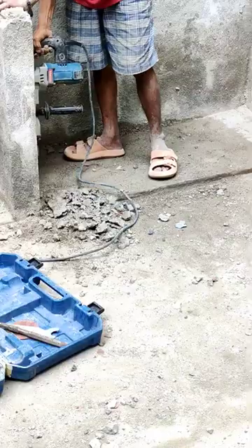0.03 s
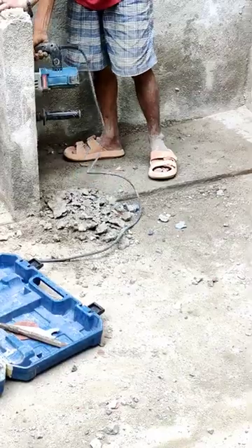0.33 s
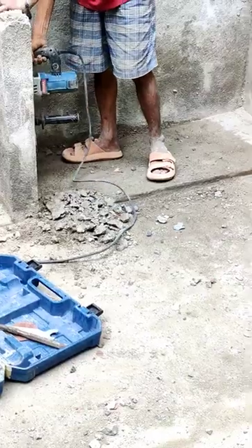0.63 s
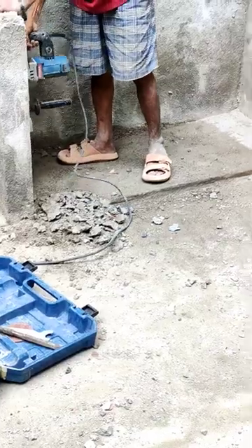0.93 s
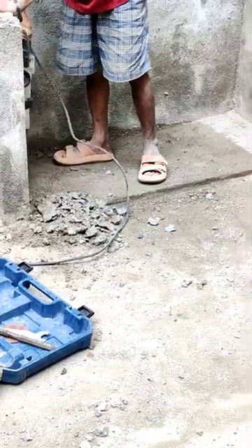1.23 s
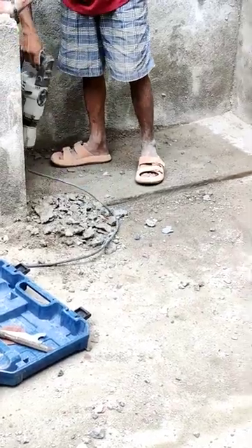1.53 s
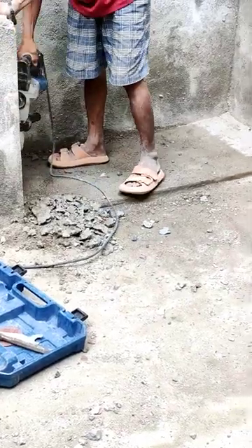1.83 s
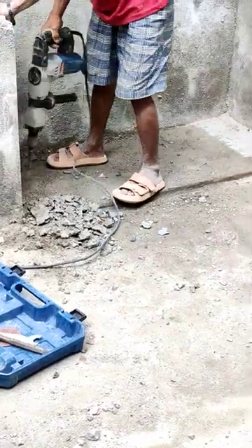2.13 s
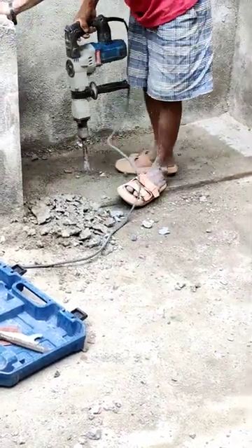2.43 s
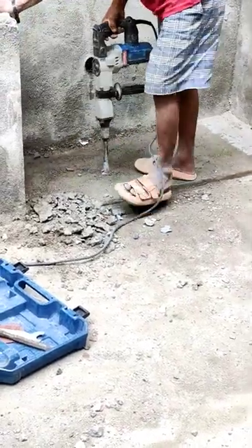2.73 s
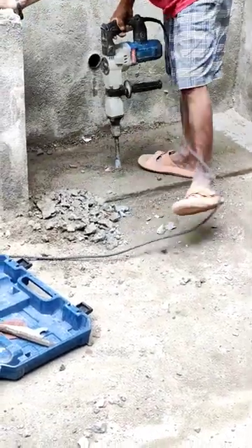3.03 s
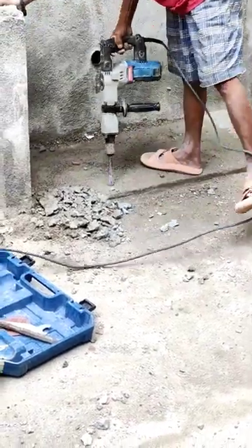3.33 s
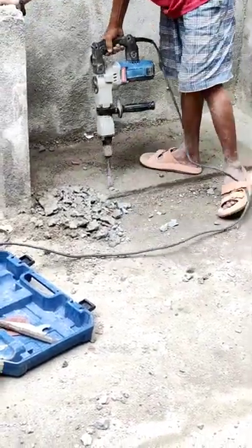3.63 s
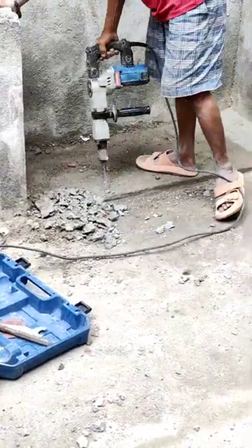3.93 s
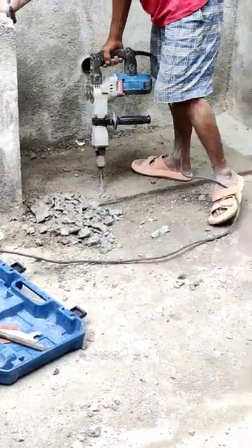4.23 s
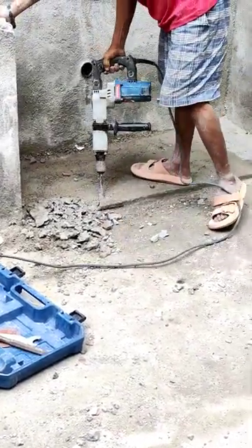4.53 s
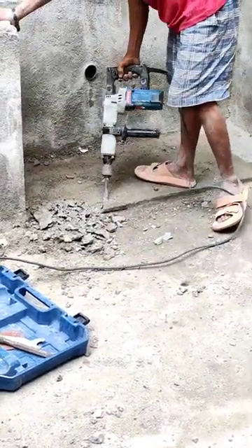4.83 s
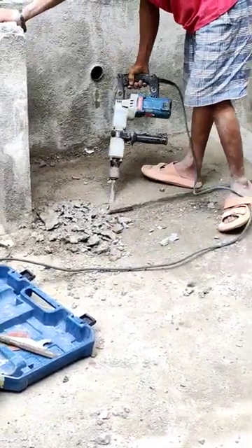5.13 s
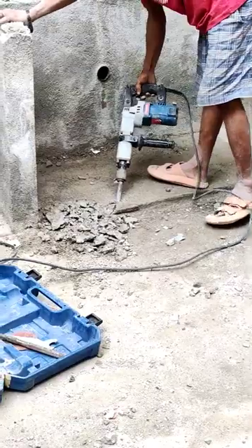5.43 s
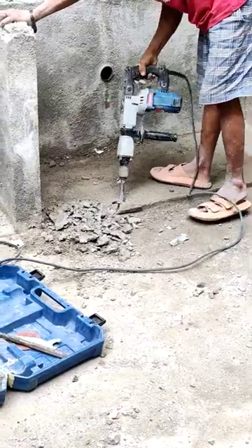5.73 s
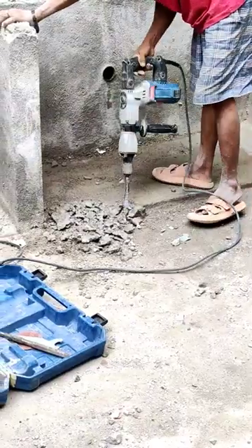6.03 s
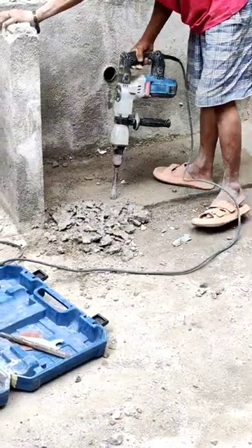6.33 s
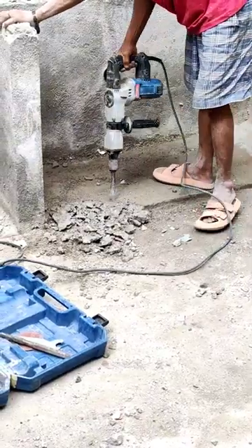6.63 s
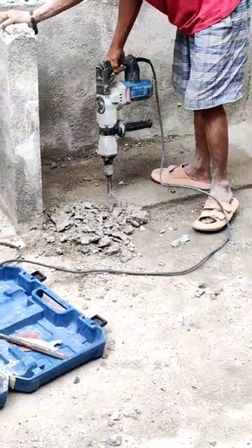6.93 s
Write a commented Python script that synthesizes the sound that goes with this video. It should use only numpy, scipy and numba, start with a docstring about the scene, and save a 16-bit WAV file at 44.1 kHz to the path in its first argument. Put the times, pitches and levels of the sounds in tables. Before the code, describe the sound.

A loud electric demolition hammer pounds a concrete floor with rapid thuds, gritty cracks and a ringing steel chisel. Lifted, it races and rattles, then knocks a few times as the motor whines down. The tip scrapes and lands, and a long burst speeds up, then slows. More knocks lead into a last short burst. A phone about two metres away picks up a short, bare-walled echo and low puffs of air in the pauses.

```python
"""A corded demolition hammer on a concrete floor in a bare room, two metres from a hand-held phone.
It opens hammering, one blow a crank turn: the slab thuds, concrete cracks, the steel chisel rings.
Lifted at 1 s, the tool races; released, it knocks a few more times as fan and gears whine down.
At 3.3 s the tip scrapes and lands, and a long burst gathers speed, then slows as the motor coasts.
Air puffs on the microphone in the pauses; at 6.5 s the tool lands again for a last short burst."""
import sys
import numpy as np
from scipy import signal
from scipy.fft import rfft, irfft
from scipy.io import wavfile
from scipy.ndimage import uniform_filter1d
from numba import njit

SR = 44100
rng = np.random.default_rng(int(sys.argv[2]) if len(sys.argv) > 2 else 0)


def output_pcm(signal):
    """Save a mono or channel-first signal as 16-bit PCM at the path in sys.argv[1].

    Samples are clipped to [-1, 1] before scaling.
    """
    pcm = np.clip(np.atleast_2d(signal).T, -1, 1) * 32767
    wavfile.write(sys.argv[1], SR, np.round(pcm).astype(np.int16))


N = 316197
TIME = np.arange(N) / SR
FREQ = np.arange(N // 2 + 1) * SR / N

# Levels in the tables are relative: each source adds its own gain.
# bursts of hammering: (first blow [s], end [s], crack level [dB])
BURSTS = [(0.131, 0.951, -21.5), (1.793, 2.031, -23.5), (3.772, 5.754, -24.5), (6.766, 7.175, -25)]
# per burst, how hard the tool is leaned on and how freely it rings: (time [s], thud [dB], ring [dB])
PRESSURE = [
    [(0.14, -28.5, -22), (0.166, -23, -22), (0.27, -18.3, -27), (0.38, -18.7, -23), (0.468, -23.3, -25),
     (0.774, -22.5, -28), (0.904, -25.5, -27), (0.99, -34, -34)],
    [(1.8, -60, -25), (2.0, -38, -38)],
    [(3.785, -21, -21.5), (3.923, -19, -26), (4.0, -19, -31), (4.25, -18.5, -28), (4.36, -19, -36),
     (4.52, -18.5, -28), (4.72, -17.3, -28), (4.86, -17, -35), (4.93, -19.5, -35), (5.3, -19, -36),
     (5.46, -24.5, -34), (5.56, -20.5, -34), (5.72, -25, -29)],
    [(6.77, -19, -23), (6.88, -19, -24), (6.97, -19, -31), (7.15, -18, -27)],
]
# single knocks of the chisel, and at 3.667 s a low thump as the motor starts: (time [s], crack [dB], thud [dB],
# ring [dB], chipping [dB])
KNOCKS = [(1.5949, -13.5, -27, -19, -19), (1.614, -15.5, -34, -28, -26), (1.6302, -16, -31, -44, -30),
          (1.7539, -11.5, -47, -21, -35), (1.7762, -11, -49, -25, -26), (3.282, -34, -41, -60, -49),
          (3.4735, -13.5, -17.5, -45, -27), (3.492, -10.5, -15, -48, -30), (3.6089, -15.5, -17.5, -53, -25),
          (3.667, -25.5, -27, -50, -45), (3.703, -18, -18, -17, -24), (3.742, -20, -22.5, -12, -22),
          (6.166, -20, -44, -44, -36), (6.497, -15, -21.5, -45, -30), (6.514, -15, -18.5, -47, -37),
          (6.572, -15.5, -21, -16, -16), (6.626, -16.5, -19, -29, -19.5), (6.688, -15.5, -17.5, -32, -22),
          (6.7317, -20, -18.5, -11, -19)]
# multiples of the blow rate that boom: (time [s], half-width [s], multiple, level [dB])
BOOMS = [(0.455, 0.16, 3, -31.5), (0.884, 0.086, 5, -23), (0.91, 0.09, 6, -36), (4.2, 0.087, 2, -40),
         (5.385, 0.085, 6, -20), (5.394, 0.11, 7, -26), (5.363, .08, 11, -28)]
# the tip scraping the floor: (time [s], level [dB])
SCRAPE_LEVEL = [(3.279, -60), (3.282, -30.5), (3.3, -27.5), (3.4, -34.5), (3.47, -34), (3.5, -70)]
# dull bumps as the tool lands: (time [s], pitch [Hz], decay to -60 dB [s], level [dB])
LANDINGS = [(3.306, 316, 0.28, -22.5), (3.318, 386, 0.18, -23), (3.459, 307, 0.11, -21),
            (3.499, 140.6, 0.45, -14), (6.497, 214, 0.2, -20), (6.508, 149.3, 0.33, -21.5)]
# trigger held: (start [s], end [s], speed aimed at [turns/s], further climb [turns/s per s])
TRIGGER = [(0.127, 1.57, 43.7, 14), (3.693, 5.42, 42.8, 6.82), (6.723, 7.2, 42, 12)]
# brief rises and sags in the crank's speed: (time [s], half-width [s], change [turns/s])
SURGES = [(0.2, 0.033, 4.5), (1.06, 0.11, 1.2), (4.95, 0.045, -3)]
# the lifted tool races: (start [s], end [s])
RACING_SPAN = (1.03, 1.595)
# fan and gears against crank speed: (speed [turns/s], level [dB])
MOTOR_LEVEL = [(10, -35), (18, -29.5), (33, -20.5), (42, -18.5), (62, -16.5)]
# motor whine: (multiple of the fan tone, level [dB])
WHINE_TONES = [(1, -14), (2, -27), (2.29, -28), (3, -23), (4, -18.5), (6, -19), (7, -27), (8, -16)]
# the whine swells and sinks as the tool is turned: (time [s], half-width [s], level change [dB])
WHINE_SWELLS = [(1.0, 0.04, 4), (1.375, 0.023, 3), (1.67, 0.041, -4), (5.15, 0.03, 5.5)]
# gears of the racing tool: (multiple of the crank speed, level [dB])
GEAR_TONES = [(12, -8), (34, -11), (56, -15)]
# puffs of air on the microphone: (time [s], half-width [s], level [dB])
PUFFS = [(2.549, 0.046, -25), (2.835, 0.026, -36), (4.987, .025, -43), (6.094, 0.043, -24),
         (6.337, 0.041, -33.5), (6.492, 0.026, -20.5)]
# faint rumble under them: (time [s], level [dB])
RUMBLE_LEVEL = [(0.13, -59), (0.9, -48), (1.3, -38.5), (1.8, -54), (2.3, -60), (3.2, -46), (3.9, -29),
                (4.4, -33.5), (5.3, -45), (7.1, -29)]

# resonances: (frequency [Hz], bandwidth [Hz], level [dB])
SLAB_MODES = [(111, 8.1, -9), (139.4, 8.2, 1), (198.5, 19, -2.5), (230, 15, 4), (272.3, 16.6, 3),
              (334, 33.6, 3.5), (383.7, 17, 4), (453, 10.5, -1.5)]
BODY_MODES = [(595, 40, -2.5), (684.5, 45, -1), (738, 38, 6.5), (810, 28, -0.5), (891, 30, 0),
              (968, 45, -1), (1067, 55, -0.5), (1252, 22, -4.5)]
CHISEL_MODES = [(3359, 50, -21), (4318, 40, -19), (6250, 160, -18), (6783, 140, -20), (9170, 110, -18),
                (11510, 50, -1.5), (11530, 200, -12), (13400, 260, -17.5)]
HOLDER_MODES = [(1684, 70, 5), (2930, 140, 4.5), (3620, 210, 6.5), (6730, 180, -1.5), (7670, 850, -4.5),
                (9100, 110, 2)]  # chisel holder and gear case
HOUSING_MODES = [(726, 57, -15), (1960, 46, -13), (3025, 440, -16), (6450, 200, -18)]

# spectra: (frequency [Hz], level [dB])
CRUNCH_SPECTRUM = [(60, -45), (120, -32), (289, -5), (486, -6.5), (725, -2), (1070, -11), (1600, -9.5),
                   (2080, -45), (3520, -120)]
CRACK_SPECTRUM = [(760, -2), (1300, -35), (1790, 5), (3730, 6), (4920, 0), (6820, 6.5), (10700, -2),
                  (11900, 0), (14400, -8), (15000, -103)]
CHIP_SPECTRUM = [(1500, -10), (4000, -5), (6500, 5), (10000, -0.5), (14000, -1), (15000, -60)]
SCRAPE_SPECTRUM = [(150, -10), (350, 1.5), (1100, 3.5), (3000, -9), (5500, -30)]
GEAR_SPECTRUM = [(180, -18), (300, -13), (490, -16), (714, -6.5), (898, -10), (1330, -8), (2040, -3.5),
                 (3400, -9), (4540, -15.5), (6400, -10.5), (13800, -25), (15000, -56)]
ROAR_SPECTRUM = [(88, -60), (150, -25), (589, -13), (714, -7), (802, -11), (1180, -11), (2020, -3),
                 (2400, -5), (4210, -11.5), (4630, -13), (13600, -24.5), (15000, -69)]
BUFFET_SPECTRUM = [(15, 6), (50, -4), (130, -5), (280, -7), (600, -31), (2000, -80)]
HOUSING_RADIATION = [(900, 2), (1500, 3), (1800, 5), (2030, 19), (2200, 6.5), (2620, 6), (3100, 3),
                     (3750, 8), (4000, 7.5), (4400, 5), (4900, 1), (5900, 3), (7500, 2.5), (9200, 5),
                     (10800, -3), (13000, -16)]  # how well the whine gets out

# the phone's noise suppressor ducks briefly: (time [s], half-width [s], level change [dB])
PHONE_DUCKS = [(0.58, 0.021, -5.5), (0.976, 0.038, -4), (1.688, 0.045, -10), (4.575, 0.025, -4.5),
               (4.952, 0.028, -6), (5.773, 0.023, -7.5)]
# likeness of the phone's two microphones: (frequency [Hz], correlation [-1 to 1])
MIC_LIKENESS = [(30, -0.3), (120, 0.9), (400, 0.63), (750, 0.41), (1400, -0.02), (15000, 0)]
# their balance: (frequency [Hz], left minus right [dB])
MIC_BALANCE = [(100, -2), (300, 0.5), (700, -1), (1300, 2.5), (2500, -1), (8000, 3)]

FIRST_BLOW_S = BURSTS[0][0]
ROOM_T60_S, TOP_HZ = 0.35, 14450


def hammering(speed):
    """One blow a crank turn in every burst: (time [s], thud [dB], crack [dB], ring [dB])."""
    rows = []
    for (start, end, crack_db), pressure in zip(BURSTS, PRESSURE):
        inside = (TIME >= start) & (TIME <= end)
        turns = np.cumsum(speed[inside]) / SR
        at = np.interp(np.arange(turns[-1]), turns, TIME[inside])
        s, thud_db, ring_db = np.transpose(pressure)
        thud = np.interp(at, s, thud_db) + 1
        steel = np.interp(at, s, ring_db) + phone_gain_db(at)
        rows.append(np.column_stack([at, thud, crack_db + phone_gain_db(at), steel]))
    return np.vstack(rows)


def blows(speed, scatter_db=2.5, jitter_s=.00009, rebound_s=.005955, rebound_db=(-11.5, -2, -2)):
    """Impulses for thud, crack and ring; the chisel's loose rebound hardly moves the slab."""
    rows = hammering(speed)
    # the slab answers evenly; the crumbling concrete does not
    rows += rng.standard_normal(rows.shape) * [jitter_s, scatter_db / 4, scatter_db, scatter_db]
    knocks = [(s, thud, crack - 7, steel + 1.5) for s, crack, thud, steel, _ in KNOCKS]
    at, *levels = np.vstack([knocks, rows]).T
    rebound_at = at + rebound_s * undb(0.4 * rng.standard_normal(len(at)))
    rebound_scatter_db = 0.97 * rng.standard_normal(len(at))
    hits = np.zeros((3, N))
    for track, db, drop_db in zip(hits, levels, rebound_db):
        np.add.at(track, (at * SR).astype(int), impulse(db))
        np.add.at(track, (rebound_at * SR).astype(int), impulse(db + drop_db + rebound_scatter_db))
    return hits


def slab(hits, lag_s=.00202):
    """Just after the crack, slab and tool ring, with a short crunch as the concrete gives."""
    hits = np.interp(TIME - lag_s, TIME, hits)
    modes = undb(-5.8) * through(hits, ring(SLAB_MODES)) + undb(-2.8) * body(hits)
    crunch = bursts(hits, t60=.024, tail_db=-4) * noise(CRUNCH_SPECTRUM)
    return room(modes, wet_db=-5) + undb(-8.5) * crunch


def body(hits, usual_db=-18, growth=0.77):
    """The tool's body rings louder the harder it is leaned on; its modes wander as it rocks."""
    s, thud_db, _ = np.vstack(PRESSURE).T
    lean_db = np.clip(np.interp(TIME, s, thud_db) - usual_db, -8, 8)
    drift = 1 + .008 * walk(7.3)
    modes = sum((-1) ** k * undb(db) * width * resonate(hits, hz * drift, float(width))
                for k, (hz, width, db) in enumerate(BODY_MODES))
    energy = SR / (4 * np.pi) * sum(undb(2 * db) * width for _, width, db in BODY_MODES)
    return modes / np.sqrt(energy) * undb(growth * lean_db)


def concrete(hits):
    """A snap and a gritty crack, new at each blow, and the clank of steel on stone, which repeats."""
    grit = unit(undb(1.2 * walk(700)))
    crack = bursts(hits, t60=.13, tail_db=-6)
    snap = undb(-19) * bursts(hits, t60=.025, tail_db=-20)
    clank = through(hits, noise(CRACK_SPECTRUM)[:, :SR // 2] * fade(t60=.09))
    return np.hypot(crack, snap) * grit * noise(CRACK_SPECTRUM) + undb(-4.5) * clank


def chisel(hits):
    """Lengthwise modes of the steel, never struck quite alike; they flare as the grip on it shifts."""
    grip = undb(-6.3 + 1.5 * walk(20))
    contact = bursts(hits, t60=.005, tail_db=6) * grip * noise()
    return through(contact, ring(CHISEL_MODES))


def chipping():
    """A single knock on fresh concrete chips it with a short, bright crack."""
    hits = np.zeros(N)
    for s, *_, db in KNOCKS:
        hits[int(s * SR)] += impulse(db - 3)
    return bursts(hits, t60=.035, tail_db=-9) * noise(CHIP_SPECTRUM)


def booms(speed):
    """Multiples of the blow rate swell as they pass through resonances of slab and room."""
    phase = 2 * np.pi * np.cumsum(speed) / SR
    tones = sum(undb(db) * bell(s, width) * np.sin(k * phase) for s, width, k, db in BOOMS)
    return tones * (TIME > FIRST_BLOW_S)


def crank(first_speed=36., top_speed=62.1, spin_up_s=.054, friction=14.1, air_drag=.0123):
    """Turns per s: the motor spins up and climbs; released, it coasts against friction and air."""
    speed = np.full(N, first_speed)
    even = np.sqrt(friction / air_drag)  # the speed at which the two brakes are equal
    for on, off, reached, climb in TRIGGER:
        held, released = np.maximum(TIME - on, 0), np.maximum(TIME - off, 0)
        aim = -np.logaddexp(-(reached + climb * held), -top_speed)  # soft ceiling
        driven = aim + (np.interp(on, TIME, speed) - aim) * np.exp(-held / spin_up_s)
        # coasting loses friction + air_drag * speed ** 2 each second
        angle = np.arctan(np.interp(off, TIME, driven) / even) - friction / even * released
        coasting = even * np.tan(np.maximum(angle, 0))
        speed = np.select([TIME < on, TIME < off], [speed, driven], coasting)
    return speed + swells(SURGES)


def motor(speed):
    """Rush and whine, both damped under load; the piston shakes the floor twice a turn."""
    running = np.clip((TIME - FIRST_BLOW_S) / .028, 0, 1)
    loaded = load()
    level = undb(curve(speed, MOTOR_LEVEL) - 1.5 * loaded + phone_gain_db(TIME)) * running
    turns = np.cumsum(speed) / SR
    # near full speed the shaking meets a low room resonance, which hums on after the tool is lifted
    shake = undb(-59.5) * through(np.sin(4 * np.pi * turns) * loaded, ring([(109.9, 1.9, 0)]))
    whine_db = -6 * loaded + swells(WHINE_SWELLS) + 1.5 * walk(18)
    tones = undb(whine_db) * whine(speed) + whirr(turns)
    return rush(level, turns) + level * tones + clatter(level, speed) + shake


def rush(level, turns):
    """Air and gear noise, louder in the mids when racing, with a slight rattle."""
    free = racing()
    gears = undb(-3.5) * np.sqrt(1 - free) * noise(GEAR_SPECTRUM)
    roar = undb(1.5) * np.sqrt(free) * noise(ROAR_SPECTRUM)
    # the housing keeps ringing as the air dies down; pressing the tool down damps it
    housing = undb(-18.5 - 11 * load()) * np.sqrt(level) * through(noise(), ring(HOUSING_MODES))
    # racing air also drives its lowest modes hard
    low_modes = ring([(729, 28, -3.5), (2080, 70, -0.5), (2900, 140, -6)])
    howl = undb(-6) * free * through(noise(), low_modes)
    rattle = undb(.098 * np.cos(2 * np.pi * turns) + .65 * walk(400))
    return (level * (gears + roar + howl) + housing) * rattle


def whine(speed, cycles_per_turn=70.5):
    """Tones of fan blades and gear teeth, slightly unsteady, swelling where the housing radiates well."""
    fan_hz = cycles_per_turn * speed * (1 + .0055 * walk(200))
    phase = 2 * np.pi * np.cumsum(fan_hz) / SR
    tones = sum(undb(db + curve(k * fan_hz, HOUSING_RADIATION)) * np.sin(k * phase) * (k * fan_hz < TOP_HZ)
                for k, db in WHINE_TONES)
    # the tones die away before the rotor stops
    return room(tones, wet_db=1) * np.minimum(speed / 22, 1) ** 3


def whirr(turns):
    """Racing, the unloaded gears sing on multiples of the crank speed, each wavering on its own."""
    tones = sum(undb(db + 2 * walk(25)) * np.sin(2 * np.pi * k * turns + .6 * walk(40))
                for k, db in GEAR_TONES)
    return room(tones * racing(), wet_db=-6)


def clatter(level, speed, ticks_per_turn=2.7):
    """Unloaded, the chisel rattles in its holder and the gears tick through their play."""
    ticks = rng.random(N) < ticks_per_turn * speed / SR
    strength = undb(2 * rng.standard_normal(N).clip(-2, 2))
    rattle = room(through(ticks * strength, ring(HOLDER_MODES)), wet_db=9)
    return undb(-9) * level * (1 - load()) * unit(rattle)


def set_down():
    """The tip scrapes the floor, then the weight of the tool makes it boom."""
    s, db = np.transpose(SCRAPE_LEVEL)
    out = undb(np.interp(TIME, s, db, left=-np.inf, right=-np.inf)) * noise(SCRAPE_SPECTRUM)
    for s, hz, t60, db in LANDINGS:
        t = np.maximum(TIME - s, 0)
        out += undb(db - 60 * t / t60) * np.sin(2 * np.pi * hz * t)
    return out


def buffeting():
    """Low, ragged puffs of air right on the microphone, over a faint rumble."""
    rumble = undb(curve(TIME, RUMBLE_LEVEL)) * (TIME > FIRST_BLOW_S)
    puffs = sum(undb(db) * bell(s, width) for s, width, db in PUFFS)
    return (rumble + puffs) * unit(noise(BUFFET_SPECTRUM) * undb(2.9 * walk(50)))


def room(x, wet_db):
    """Direct sound plus the dense echo of bare walls."""
    echo = noise()[:, :SR // 2] * fade(ROOM_T60_S) * (TIME[:SR // 2] > .003)
    return (x + undb(wet_db) * through(x, echo)) / np.sqrt(1 + undb(2 * wet_db))


def load():
    """1 while the chisel is pressed down, 0 while it is lifted."""
    pressed = sum((TIME > start) & (TIME < end) for start, end, _ in BURSTS)
    return uniform_filter1d(1. * pressed, size=1200)


def racing():
    """1 while the lifted tool races."""
    start, end = RACING_SPAN
    return uniform_filter1d(1. * ((TIME > start) & (TIME < end)), size=1200).clip(0, 1)


def phone_gain_db(t, start_db=-14.5, fade_in_s=.31):
    """The phone's gain on crack, ring and motor fades in at the start and ducks briefly at set times."""
    return start_db * np.clip(1 - (t - FIRST_BLOW_S) / fade_in_s, 0, 1) + swells(PHONE_DUCKS, t)


def bursts(hits, t60, tail_db):
    """Envelope of the noise that hits set off: a short burst and its tail in the room."""
    tail = undb(2 * tail_db)
    power = (fade(t60) ** 2 + tail * fade(ROOM_T60_S) ** 2) / (1 + tail)
    return np.sqrt(np.maximum(through(hits ** 2, power), 0))


def ring(modes):
    """Unit-energy response of modes; neighbours start in opposite directions."""
    t = TIME[:SR // 2]
    h = sum((-1) ** k * undb(db) * width * np.exp(-np.pi * width * t) * np.cos(2 * np.pi * hz * t)
            for k, (hz, width, db) in enumerate(modes))
    return h / np.sqrt(np.sum(h ** 2))


@njit
def resonate(x, hz, width):
    """One mode whose frequency may move every sample."""
    out, z = np.empty(len(x)), 0j
    for i in range(len(x)):
        z = z * np.exp(np.pi * (2j * hz[i] - width) / SR) + x[i] + 1e-18
        out[i] = z.real
    return out


def noise(spectrum=((1000, 0),)):
    """Noise at the two microphones, alike in the upper bass and unrelated in the treble."""
    mid, side = rng.standard_normal((2, 2 * len(FREQ))).view(complex)
    likeness = across(MIC_LIKENESS)
    pair = mid * np.sqrt(1 + likeness) + np.array([[1], [-1]]) * side * np.sqrt(1 - likeness)
    return unit(irfft(pair * undb(across(spectrum)), N))


def walk(rate):
    """Random levels held 1 / rate s and smoothed twice; spread near 1."""
    hold = int(SR / rate)
    steps = np.repeat(rng.standard_normal(N // hold + 1), hold)
    return 1.316 * uniform_filter1d(uniform_filter1d(steps, hold), hold)[:N]


def through(x, response):
    """Convolve with the first half second of a response."""
    return signal.fftconvolve(np.atleast_2d(x), np.atleast_2d(response)[:, :SR // 2], axes=1)[:, :N]


def fade(t60):
    """A dying amplitude of unit energy."""
    decay = undb(-60 * TIME[:SR // 2] / t60)
    return decay / np.sqrt(np.sum(decay ** 2))


def impulse(db):
    """Height of impulses that reach this rms level at 50 a second."""
    return undb(db) * np.sqrt(SR / 50)


def bell(s, width, t=TIME):
    """A bell-shaped swell of height 1 at time s."""
    return np.exp(-((t - s) / width) ** 2 / 2)


def swells(rows, t=TIME):
    """Sum of bells: (time [s], half-width [s], height)."""
    return sum(height * bell(s, width, t) for s, width, height in rows)


def curve(x, points):
    """Join points with straight lines."""
    return np.interp(x, *np.transpose(points))


def across(points):
    """Join (frequency [Hz], value) points on a log-frequency axis."""
    hz, value = np.transpose(points)
    return np.interp(np.log(FREQ + 1), np.log(hz), value)


def undb(db):
    """Decibels to gain."""
    return 10 ** (np.asarray(db) / 20)


def unit(x):
    """Scale to rms 1."""
    return x / np.sqrt(np.mean(x ** 2))


def scene():
    """The hammer from two metres: blows and motor share one crank speed."""
    speed = crank()
    thuds, cracks, rings = blows(speed)
    strikes = slab(thuds) + concrete(cracks) + chisel(rings) + chipping() + booms(speed)
    return strikes + motor(speed) + set_down() + buffeting()


def record(dry):
    """The phone's two microphones differ a little in colour; peaks are rounded and the top is cut."""
    colour = undb(np.array([[.5], [-.5]]) * across(MIC_BALANCE))
    mics = irfft(rfft(dry) * colour, N) * (TIME > FIRST_BLOW_S / 2)
    rounded = mics / (1 + (mics / .85) ** 6) ** (1 / 6)
    return signal.sosfilt(signal.ellip(10, .2, 70, TOP_HZ, fs=SR, output="sos"), rounded)


dry = scene()
out = record(dry)
output_pcm(out)
```